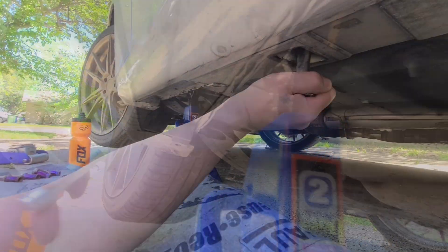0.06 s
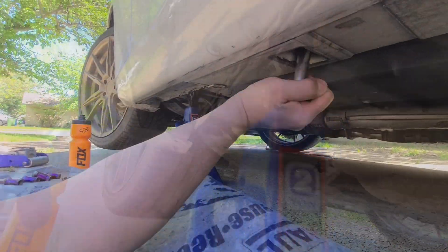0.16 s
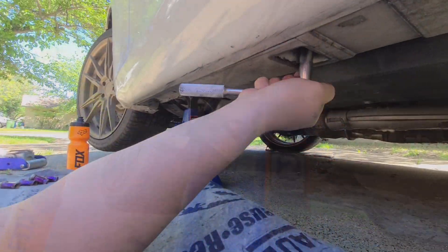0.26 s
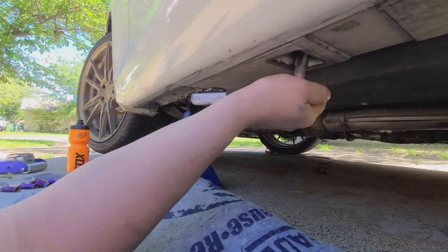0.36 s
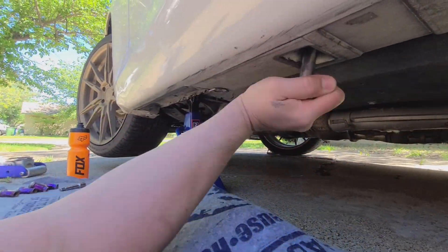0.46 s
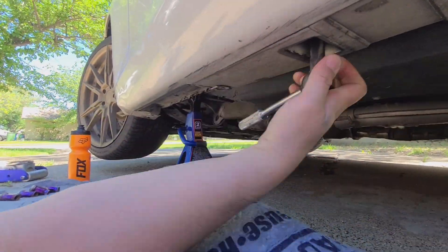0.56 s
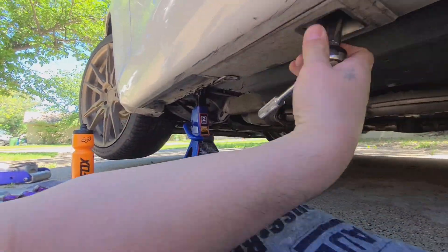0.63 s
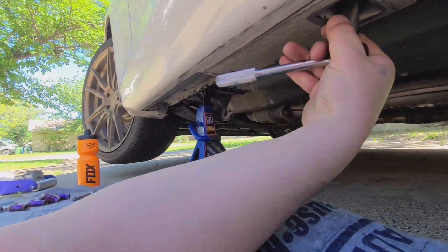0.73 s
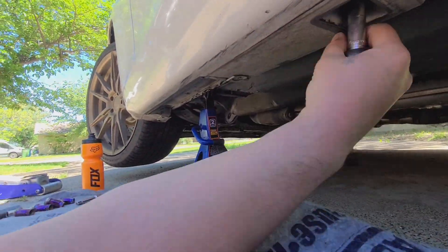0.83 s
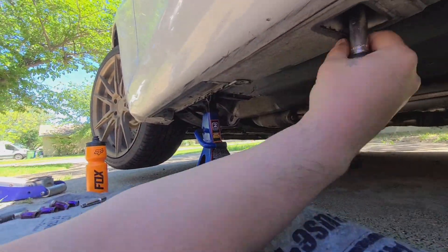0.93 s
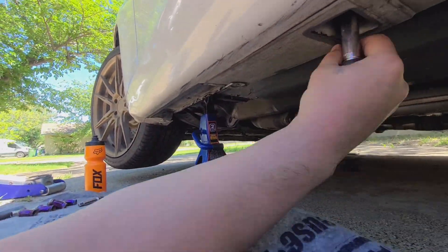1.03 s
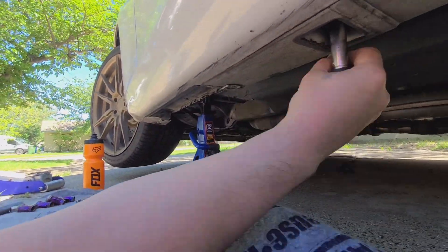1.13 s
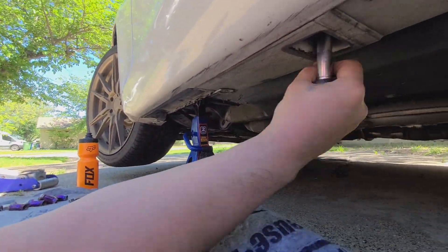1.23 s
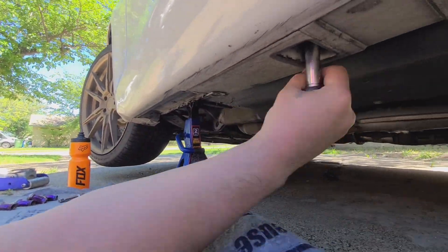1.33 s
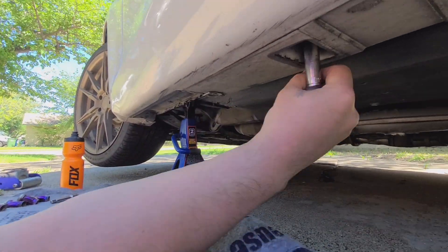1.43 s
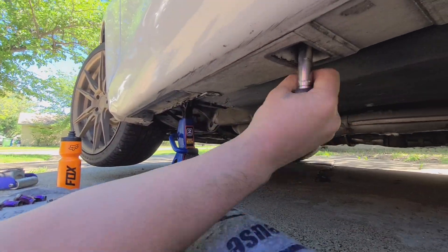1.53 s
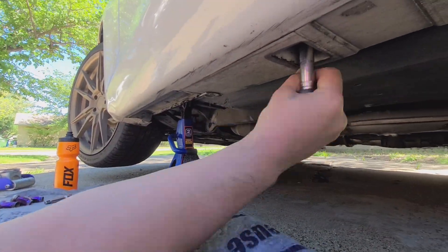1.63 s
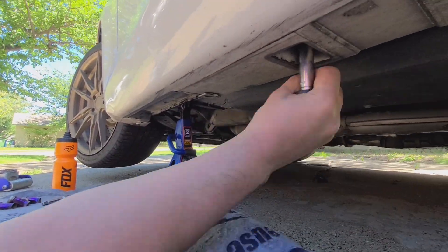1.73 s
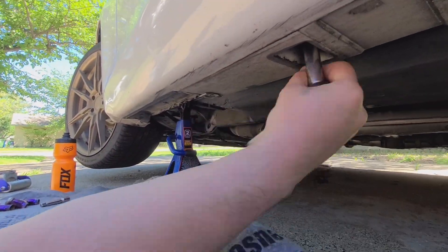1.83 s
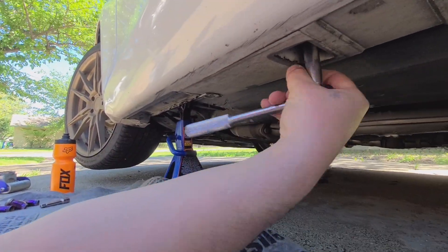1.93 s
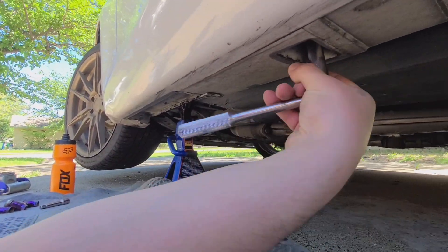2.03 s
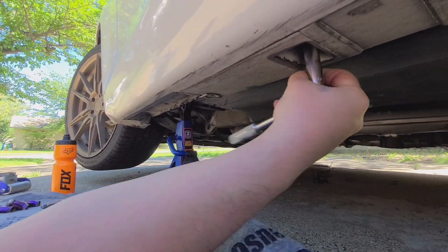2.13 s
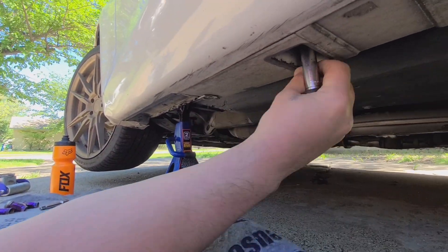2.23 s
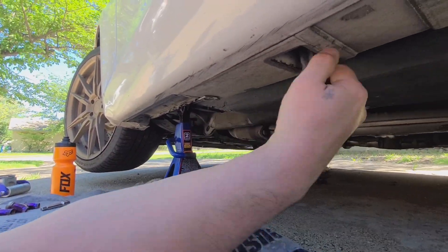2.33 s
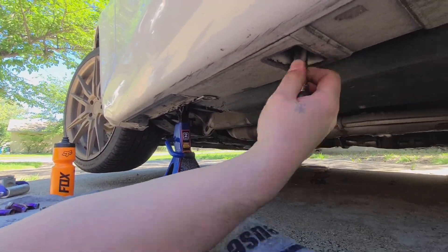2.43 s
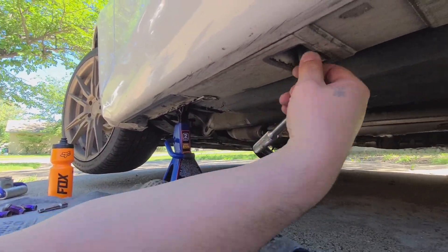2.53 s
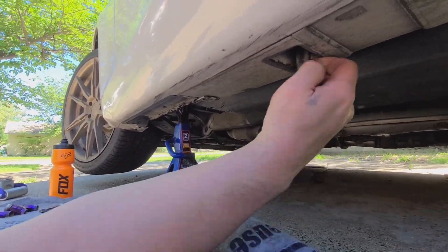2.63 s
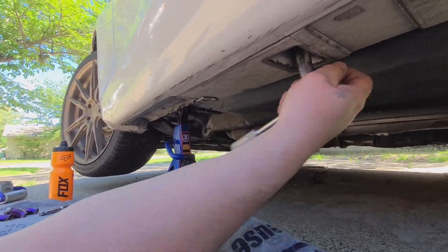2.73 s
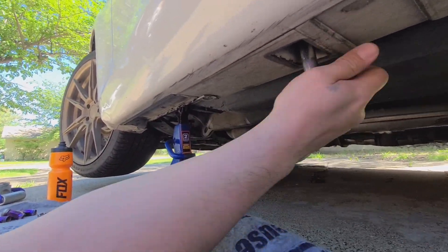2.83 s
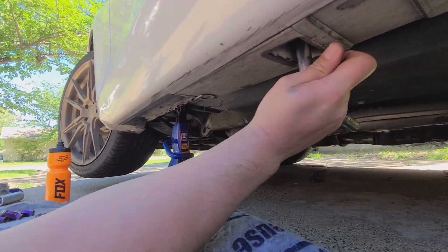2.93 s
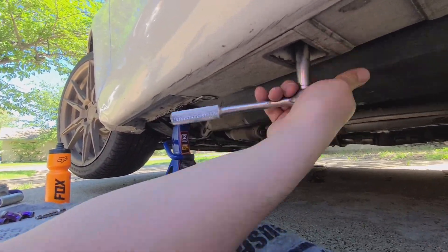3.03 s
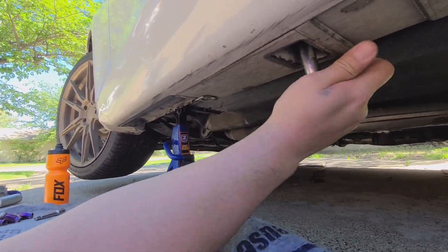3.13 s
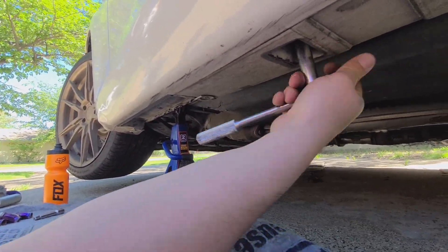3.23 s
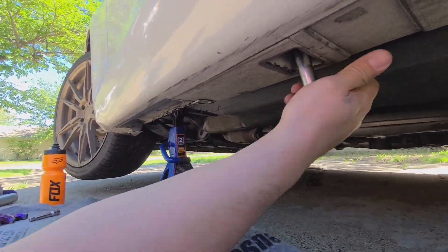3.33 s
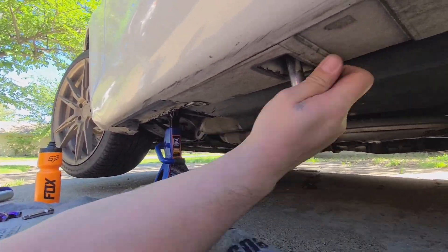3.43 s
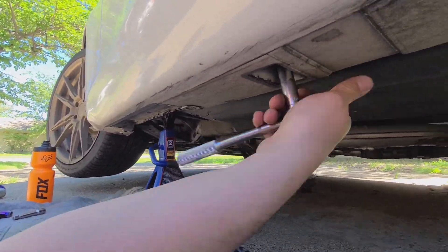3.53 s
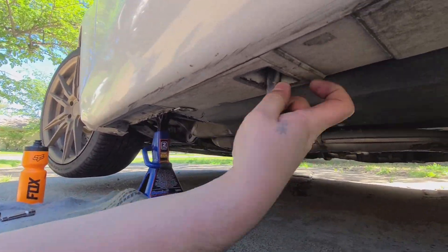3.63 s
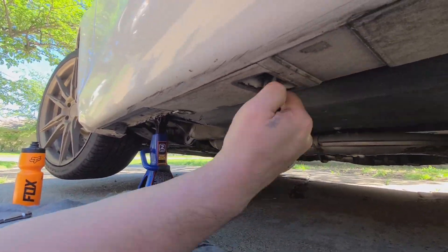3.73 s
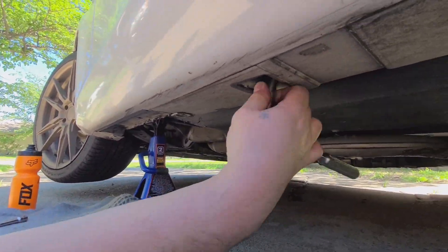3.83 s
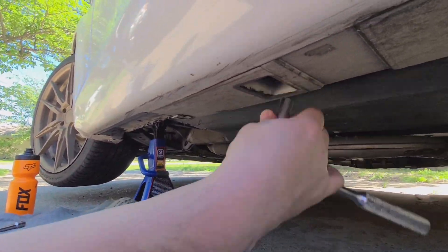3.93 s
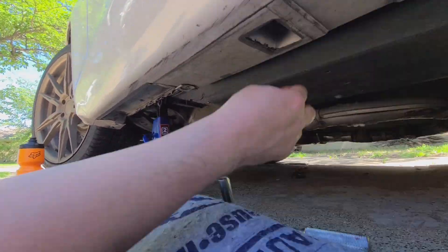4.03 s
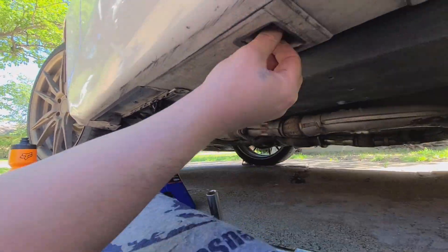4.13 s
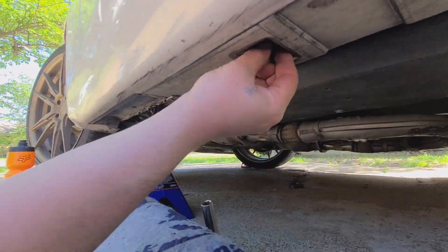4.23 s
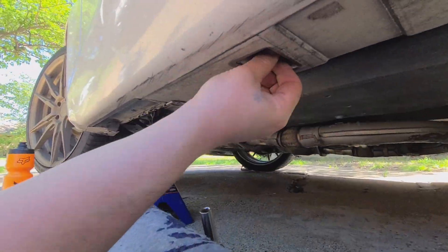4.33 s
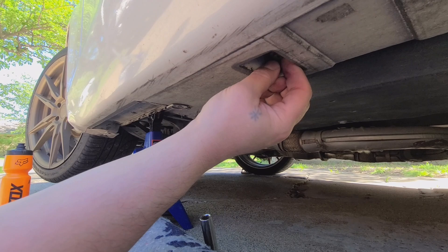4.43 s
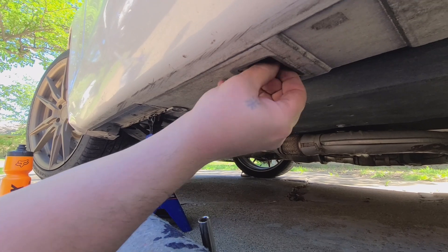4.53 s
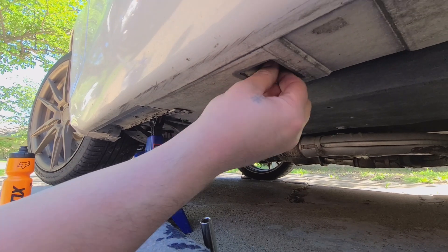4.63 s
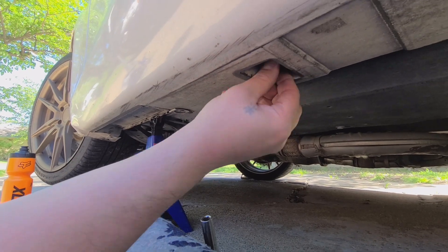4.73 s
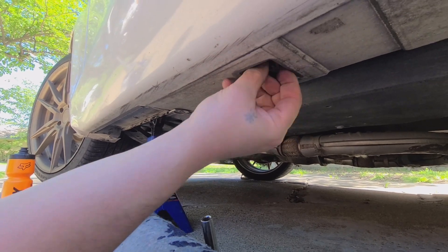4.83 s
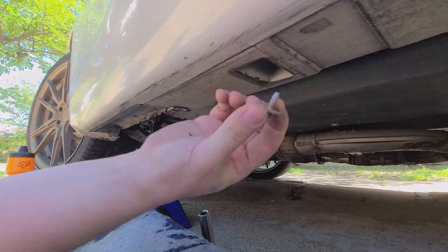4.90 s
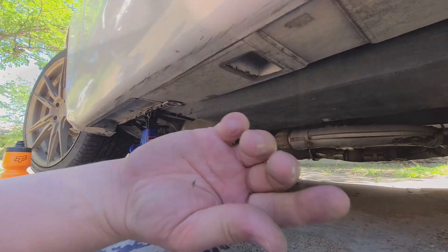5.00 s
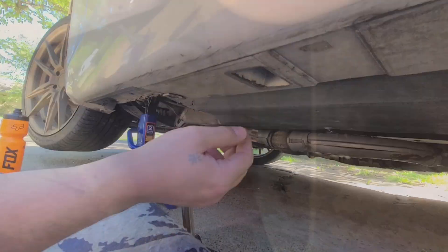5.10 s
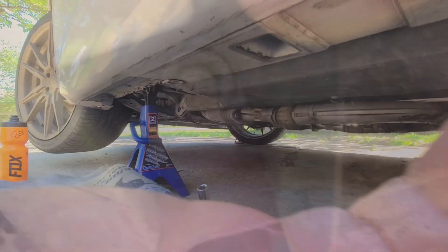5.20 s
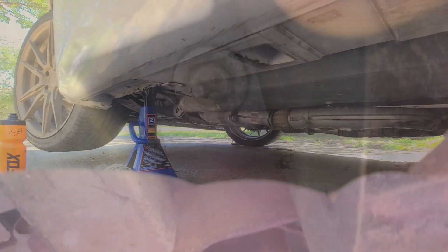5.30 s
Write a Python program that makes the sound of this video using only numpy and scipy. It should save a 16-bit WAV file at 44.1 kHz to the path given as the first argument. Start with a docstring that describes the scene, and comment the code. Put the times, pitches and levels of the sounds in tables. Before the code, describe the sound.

Outdoors, over a low neighbourhood rumble, distant hiss and very faint insects, a socket ratchet works on a bolt beneath a car. Its bright, dry clicks come close up in two irregular runs with a short gap between them, mixed with dull bumps on the underbody. A hard knock with a brief steel ring ends the work, and only light hand scuffs and soft thumps follow.

```python
"""A socket ratchet works a bolt under a car, over neighbourhood rumble, far hiss and thin insect bands.
From 0.1 s the pawl clicks in quick groups: each impact excites the steel's modes and is cut off after
a few hundredths of a second. Hands and tools scuff and bump the hollow underbody. The clicks pause
at 2.1 s, resume at 2.6 s and end around a hard knock near 4 s; soft bumps and scuffs follow."""
import sys
import numpy as np
from scipy import signal
from scipy.fft import rfft, irfft, next_fast_len
from scipy.io import wavfile
from scipy.ndimage import uniform_filter1d, map_coordinates

SR = 44100
rng = np.random.default_rng(int(sys.argv[2]) if len(sys.argv) > 2 else 0)


def digitize_waveform(pressure):
    """Quantize a signal to 16-bit integers and store it at the path in sys.argv[1].

    Rows of a 2-D input are taken as channels; values are limited to [-1, 1].
    """
    field = np.atleast_2d(pressure).T
    bounded = np.clip(field, -1, 1)
    quanta = np.round(bounded * 32767).astype(np.int16)
    wavfile.write(sys.argv[1], SR, quanta)


N = 236287

# Background envelopes: (time [s], rumble [dB], drone [dB], hiss [dB])
YARD_LEVELS = [(0, -37, -36, -49.5), (0.199, -41, -36.5, -53.5), (0.501, -46, -45, -55),
               (.8, -47.5, -45, -54), (1, -46, -41.5, -52.5), (1.57, -45, -34.5, -50),
               (2.05, -38, -39, -54.5), (2.4, -42, -42, -52), (3.05, -39.5, -37, -51.5),
               (3.55, -39, -44, -56), (4.09, -39, -38.5, -52), (4.251, -50.5, -41, -58),
               (4.5, -42, -38.5, -57), (4.8, -39, -35.5, -57), (5.36, -40.5, -40.5, -52.5)]
# Gain of the drone's upper band: (time [s], level [dB])
UPPER_DRONE_GAIN = [(0, -2), (.9, 6.5), (2, 3.5), (3.9, 5), (4.4, -6), (5.36, -12.5)]
# Noise spectra: (frequency [Hz], relative level [dB])
RUMBLE_SPECTRUM = [(15, -37.5), (30, -0.5), (60, 18), (110, 12.5), (170, -4.5), (260, -54.5)]
DRONE_SPECTRUM = [(90, -4.5), (150, 2), (240, -1), (340, -11), (400, -10.5), (440, -6.5), (490, -18.5),
                  (560, -19), (680, -29.5), (900, -70)]
HISS_SPECTRUM = [(400, -11.5), (750, -5.5), (1200, 0), (1600, -2), (3000, -12), (3700, -12.5),
                 (4300, -15.5), (5500, -23.5), (7000, -50)]
AIR_SPECTRUM = [(4000, -38.5), (5500, -3.5), (7500, -14), (10000, -4), (12500, -16), (15500, -13.5),
                (16200, -34)]
CRACK_SPECTRUM = [(500, -44), (1500, -1.5), (3000, -9), (5000, 9), (7000, 1), (9000, 4), (12000, 6.5),
                  (13200, 3), (15500, 6.5), (15900, -13), (16550, -11.5), (16900, -45.5)]
SCUFF_SPECTRUM = [(700, -17), (1500, 7.5), (3500, 13), (6000, -1.5), (8000, -35)]
SCUFF_TREBLE_SPECTRUM = [(4000, -20), (7000, -4.5), (12000, -6), (15500, -12), (16200, -51)]
# Echo spectrum relative to the crack's: (frequency [Hz], level [dB])
ECHO_COLOUR = [(1500, 5.5), (3500, 12.5), (5500, -8), (8000, -2.5), (12000, -9), (15000, 0.5)]
# Left-right likeness of diffuse noise: (frequency [Hz], correlation [1])
COHERENCE = [(25, .87), (300, .9), (600, .5), (1000, .05), (4000, .15), (6500, .5), (12000, .7)]
# Left over right for near sounds: (frequency [Hz], level [dB])
NEAR_BALANCE = [(200, -4.5), (600, 6), (1300, 1.5), (3000, 13), (4500, 6), (7000, -6.5), (12000, -12.5)]
# Resonances of the hollow under the car: (frequency [Hz], bandwidth [Hz], level [dB])
CAVITY_MODES = [(158, 75, 3), (201, 122.7, 3), (410, 74, 1), (544, 69, -7), (1216, 264, -16)]
# Blows on the underbody: (time [s], duration [s], level [dB], frequency [Hz])
UNDERBODY_KNOCKS = [(0.103, 0.024, -27.5, 431), (0.227, 0.031, -16.5, 228), (0.291, 0.023, -23, 187),
                    (0.388, 0.029, -28, 429), (0.743, 0.042, -33, 590), (0.815, 0.022, -21.5, 398.5),
                    (1.084, 0.01, -27.5, 454), (1.386, 0.037, -20.5, 190), (1.971, 0.053, -32, 92),
                    (2.96, 0.021, -31, 440), (2.311, 0.042, -27, 401), (3.748, 0.03, -26, 410),
                    (3.981, 0.009, -11, 539), (3.982, 0.0063, -24.5, 169), (3.998, 0.014, -22.5, 555),
                    (4.024, 0.019, -32, 533), (4.079, 0.014, -22, 550), (4.139, 0.033, -37, 410),
                    (4.495, 0.03, -33.5, 396), (4.714, 0.022, -28.5, 249), (4.753, 0.063, -31.5, 200),
                    (4.836, 0.029, -29.5, 398)]
# Skin and cloth rubbing: (time [s], duration [s], level [dB], treble level [dB])
RUBS = [(0.224, 0.015, -45, -64.5), (0.324, 0.089, -61, -65), (0.452, 0.039, -51.5, -57),
        (0.741, 0.03, -41, -53), (0.808, 0.035, -43.5, -57), (0.816, 0.0064, -34, -58),
        (1.081, 0.04, -44.5, -74), (1.989, 0.087, -57.5, -59), (2.167, 0.031, -66, -71),
        (2.301, 0.048, -46.5, -58.5), (3.743, 0.024, -53.5, -58), (3.917, 0.024, -54, -61.5),
        (3.978, 0.01, -23, -45), (3.987, 0.028, -34, -39.5), (4.067, 0.029, -46.5, -52.5),
        (4.138, 0.038, -55, -63), (4.231, 0.05, -60.5, -74), (4.293, 0.034, -56.5, -73.5),
        (4.452, 0.021, -61.5, -74), (4.528, 0.023, -61.5, -76), (4.741, 0.018, -57, -69.5),
        (4.766, 0.064, -57.5, -75.5), (4.814, 0.0099, -59, -59), (4.828, 0.033, -43.5, -59.5),
        (5.077, 0.021, -52, -53.5), (5.167, 0.019, -48.5, -54.5)]
# Modes of the tool: (frequency [Hz], relative level [dB], base T60 [s])
HEAD_MODES = [(4540, -7, 0.015), (5100, -18, 0.044), (7650, -10, 0.018), (7776, -1, 0.059),
              (9200, -4.5, 0.053), (9430, -12, 0.038), (10100, -9.5, 0.052), (11500, -9.5, 0.011),
              (12100, -0.5, 0.086), (13400, -6.5, 0.049), (12240, -2, .04), (15300, 0, 0.052),
              (15500, -5, .02)]
HANDLE_UPPER_MODES = [(4090, -8, 0.0042), (4750, -8.5, 0.016), (5270, -10, 0.018), (7150, -15.5, 0.027)]
# The socket's pitch shifts with its seat on the bolt: (time [s], frequency [Hz])
SOCKET_PITCH = [(0, 1193), (2.75, 1181), (2.86, 1370), (3.05, 1412), (3.98, 1149)]
# The hand's hold on the tool: (time [s], ring time factor [1], treble tilt [dB])
HAND_GRIP = [(0, 1.1, -6), (.45, 0.97, 1.5), (.8, 0.57, 7), (1.15, 0.72, -6), (1.4, 1.32, 8),
             (1.68, 0.45, 5), (1.8, 1.35, -4), (2.05, 0.76, 0), (2.7, 1.34, 5.5), (2.87, 0.92, -0.5),
             (3.2, 1.2, 7), (3.55, 0.45, -1.5), (3.87, 1.6, 17.5), (3.97, 1.35, -10), (4.08, 2, 4)]
# Steel contacts; a few weak rows, such as 0.099 s, are a ring already sounding rather than a new blow: # (time
# [s], crack [dB], handle ring [dB], ring frequency [Hz], clank [dB], clank frequency [Hz], # socket ring [dB],
# duration [s])
PAWL_CLICKS = [(0.099, -31.5, -34, 3670, -47, 3280, -39, 0.026),
               (0.112, -18.5, -32, 3650, -23, 3960, -34.5, 0.019),
               (0.128, -23.5, -37, 3768, -30, 3490, -52, 0.03),
               (0.26, -31.5, -40, 3810, -42, 3170, -59, 0.0044),
               (.396, -13, -37, 3580, -19.5, 3190, -27.5, 0.023),
               (0.414, -16, -30, 3570, -21.5, 3420, -44, 0.0078),
               (.547, -43, -40, 3650, -44, 3320, -41, 0.0031),
               (0.737, -29, -39, 3810, -36.5, 3570, -39, .022),
               (0.765, -16, -37, 3720, -45, 3300, -30.5, 0.0069),
               (.892, -12.5, -32.5, 3710, -29, 3480, -43, .01),
               (0.913, -58, -60, 3800, -60, 3260, -67, .03), (0.974, -44, -55, 3750, -52, 4500, -60, 0.011),
               (0.99, -14.5, -27.5, 3710, -40, 3270, -36.5, 0.033),
               (1.1, -17, -26, 3710, -25, 3220, -29, .035),
               (1.193, -13, -31.5, 3830, -28.5, 3270, -51, 0.036),
               (1.231, -52.5, -38, 3790, -50, 3340, -60, 0.0028),
               (1.291, -17, -23, 3790, -31, 3200, -32.5, 0.02),
               (1.312, -20, -27.5, 3870, -29, 3470, -50, 0.032),
               (1.388, -13.5, -26, 3774, -16.5, 3400, -60, 0.025),
               (1.406, -15, -28, 3736, -17.5, 3290, -55, 0.029),
               (1.475, -25.5, -38, 3736, -31.5, 3400, -43, 0.029),
               (1.499, -16, -32.5, 3530, -26, 4250, -44, 0.012),
               (1.522, -37, -37, 3800, -30.5, 3120, -48, 0.028),
               (1.586, -14, -23, 3590, -38, 5200, -58, 0.016),
               (1.604, -25, -43, 3480, -39, 4710, -59, 0.011),
               (1.622, -39, -43, 3800, -34, 3180, -51, 0.0045),
               (1.631, -60, -37, 3620, -52, 3300, -60, 0.012),
               (1.673, -14.5, -21, 3686, -26, 3220, -36.5, 0.076),
               (1.801, -13, -19, 3810, -21.5, 3360, -29.5, 0.023),
               (1.819, -13, -22, 3766, -17, 3440, -41, 0.037),
               (1.909, -13, -30, 3660, -25, 3510, -40, 0.028),
               (1.933, -16.5, -30, 3900, -33, 3070, -35.5, 0.041),
               (2.036, -14.5, -22.5, 3780, -21, 3710, -60, .026),
               (2.06, -11.5, -17.5, 3790, -31, 4200, -36.5, 0.03),
               (2.629, -25.5, -27, 3800, -29, 3130, -34, .034),
               (2.657, -34.5, -37, 3750, -52, 3220, -41, 0.041),
               (2.691, -39, -42, 3800, -54, 3180, -50, 0.026),
               (2.706, -15, -25, 3766, -32.5, 3120, -33, .025),
               (2.847, -18, -27.5, 3830, -33.5, 3140, -36, 0.025),
               (2.869, -16.5, -20, 3660, -44, 3100, -25.5, 0.028),
               (2.884, -26, -48.5, 3710, -40, 3200, -38, 0.0067),
               (2.896, -10.5, -19, 3740, -25, 3170, -30, 0.022),
               (3.017, -15, -30.5, 3670, -29, 3140, -20, 0.043),
               (3.018, -18.5, -44, 3600, -38, 4560, -36.5, .003),
               (3.035, -13.5, -40.5, 3716, -28.5, 3310, -21.5, 0.017),
               (3.181, -19, -28, 3840, -26.5, 3413, -47, 0.016),
               (3.202, -26.5, -33, 3747, -35.5, 3340, -45, 0.02),
               (3.225, -9, -25, 3744, -27.5, 3260, -55, 0.013),
               (3.338, -18.5, -21.5, 3770, -25.5, 3330, -37, 0.045),
               (3.366, -42, -43, 3750, -43.5, 4200, -38.5, 0.035),
               (3.536, -15, -24.5, 3720, -24.5, 3290, -31.5, 0.037),
               (3.55, -42.5, -46, 3720, -49, 3050, -45, 0.0075),
               (3.845, -41.5, -39.5, 3830, -55, 3330, -61, 0.024),
               (3.86, -16, -25.5, 3787, -49, 3230, -35.5, 0.041),
               (3.982, -16.5, -15, 3593, -19, 3495, -18, 0.046),
               (4.082, -37.5, -26.5, 3575, -38, 3260, -29.5, 0.018)]

LEAD_S = 0.006  # a click starts this long before its impact
CLICK_TIME = np.arange(SR // 14) / SR - LEAD_S
RING_TIME = np.maximum(CLICK_TIME, 0)
ATTACK = 1 - np.exp(-(RING_TIME / 0.00094) ** 2)


def amp(db):
    """Amplitude grows tenfold per 20 dB."""
    return 10 ** (np.asarray(db) / 20)


def unit(x):
    """Normalisation to rms 1."""
    return x / np.sqrt(np.mean(x ** 2) + 1e-20)


def along(points, hz):
    """Interpolation on a logarithmic frequency axis."""
    freqs, values = np.transpose(points)
    return np.interp(np.log(hz + 1), np.log(freqs + 1), values)


def spectrum(points):
    """Amplitude response through points in dB."""
    return lambda hz: amp(along(points, hz))


def at_time(table, t):
    """Linear interpolation of each column in time."""
    times, *columns = np.transpose(table)
    return [np.interp(t, times, column) for column in columns]


def filtered(x, response):
    """Linear filtering: the spectrum times a complex response."""
    size = next_fast_len(x.shape[-1] + 8192)
    return irfft(rfft(x, size) * response(np.fft.rfftfreq(size, 1 / SR)), size)[..., :x.shape[-1]]


def wobble(rate):
    """Smooth random modulation, rate knots a second."""
    return map_coordinates(rng.standard_normal(int(N * rate / SR) + 4), [np.arange(N) * rate / SR])


def cutoff(t, lasts, fade):
    """Gating: a linear fade centred on the end of the duration."""
    return np.clip((lasts - t) / fade + .5, 0, 1)


def diffuse_noise(response, coherence=COHERENCE):
    """Partially coherent stereo noise: the mid-side ratio sets the correlation."""
    def mid_side(hz):
        angle = np.arccos(np.clip(along(coherence, hz), -1, 1)) / 2
        return response(hz) * [np.cos(angle), np.sin(angle)]
    mid, side = filtered(rng.standard_normal((2, N)), mid_side)
    return unit(np.array([mid + side, mid - side]))


def streaky(x, depth_db):
    """Spectral modulation: narrow, random streaks of pitch, each a few hundredths of a second long."""
    bins = signal.stft(x, nperseg=512)[2]
    field = uniform_filter1d(rng.standard_normal(bins.shape[1:]), size=2, axis=0)
    field = uniform_filter1d(field, size=6, axis=1)
    return unit(signal.istft(bins * amp(depth_db * unit(field)), nperseg=512)[1][:, :N])


def near_field(x, lean=1):
    """Path difference: near sounds reach the right first; the treble arrives in phase."""
    def response(hz):
        lag = np.exp(-4j * np.pi * np.tanh((hz / 6400) ** 3) ** (1 / 3))
        return amp(lean * along(NEAR_BALANCE, hz) * [[.5], [-.5]]) * [lag, np.ones_like(hz)]
    return filtered(x, response)


def neighbourhood(split_hz=346):
    """Amplitude-modulated noise: rumble, drone and hiss jump in level together; the treble flickers."""
    t = np.arange(N) / SR
    rumble_db, drone_db, hiss_db = at_time(YARD_LEVELS, t)
    jump = wobble(28)
    rumble = amp(rumble_db + 3.3 * wobble(20) + 2 * jump) * diffuse_noise(spectrum(RUMBLE_SPECTRUM))
    drone_db += 1.2 * wobble(13) + 2.2 * jump + 2.2 * wobble(30)
    drone = amp(drone_db) * diffuse_noise(spectrum(DRONE_SPECTRUM))
    upper = filtered(drone, lambda hz: 1 / (1 + (split_hz / (hz + 1)) ** 8))
    drone += upper * (amp(at_time(UPPER_DRONE_GAIN, t)[0] + 2.6 * wobble(22.01)) - 1)
    hiss_gain = amp(hiss_db + 1.2 * jump + .8 * wobble(28))
    hiss = near_field(diffuse_noise(spectrum(HISS_SPECTRUM), coherence=[(1000, .5)]), lean=.3)
    air_gain = amp(hiss_db - 22 + 2.3 * wobble(24))
    air = streaky(diffuse_noise(spectrum(AIR_SPECTRUM)), depth_db=5)
    return (rumble + drone) * amp([[.4], [-.4]]) + hiss_gain * hiss + air_gain * air


def insects():
    """Narrow-band noise: insects hold two faint, wavering pitches."""
    high = amp(-84 + 2.5 * wobble(19)) * diffuse_noise(lambda hz: np.exp(-((hz - 10300) / 180) ** 2))
    low = amp(-87 + 3 * wobble(5)) * diffuse_noise(lambda hz: np.exp(-((hz - 5700) / 400) ** 2))
    return high + low


def cavity(hz):
    """Modal superposition: the hollow's resonances add in alternating sign, low-passed."""
    modes = sum((-1) ** k * amp(db) * 1j * hz * width / (centre ** 2 - hz ** 2 + 1j * hz * width)
                for k, (centre, width, db) in enumerate(CAVITY_MODES))
    return modes / (1 + (hz / 2500) ** 2)


def knocks(thud_db=-9):
    """Impact excitation: the underbody gives a damped boom and a thud of cavity-filtered noise."""
    t = np.arange(SR // 12) / SR
    thud, boom = np.zeros((2, N + SR))
    for start, lasts, db, hz in UNDERBODY_KNOCKS:
        span = round(start * SR) + np.arange(len(t))
        shape = np.clip(t / 0.0012, 0, 1) * cutoff(t, lasts, fade=0.0039)
        thud[span] += amp(db + thud_db) * shape * np.clip(t / 0.0013, 0, 1)
        boom[span] += amp(db - 60 * t / 0.09) * shape * np.sin(2 * np.pi * hz * t)
    return near_field(boom[:N]) + thud[:N] * diffuse_noise(cavity)


def scuffs():
    """Sliding friction: skin and cloth give short swells of noise in two bands."""
    t = np.arange(SR // 12) / SR
    gains = np.zeros((2, N + SR))
    for start, lasts, db, treble_db in RUBS:
        span = round(start * SR) + np.arange(len(t))
        swell = np.clip(t / [[.007], [.009]], 0, 1) * cutoff(t, lasts, fade=1.1 * lasts)
        gains[:, span] += amp([[db], [treble_db]]) * swell
    rub = streaky(diffuse_noise(spectrum(SCUFF_SPECTRUM), coherence=[(1000, .3)]), depth_db=5.5)
    treble = streaky(diffuse_noise(spectrum(SCUFF_TREBLE_SPECTRUM)), depth_db=5)
    return gains[0, :N] * near_field(rub, lean=.25) + gains[1, :N] * treble


def scattered(x):
    """Scattering: the underbody throws treble back, by a new path for each side and click."""
    t = np.arange(SR // 100) / SR
    tail = rng.standard_normal((2, len(t))) * amp(-60 * t / 0.0043)
    tail = np.diff(tail / np.linalg.norm(tail[0]), axis=1) / 2
    return amp(2.5) * signal.fftconvolve(x, tail, axes=1)[:, :x.shape[1]]


def damped_tone(hz, db, t60, phase=0):
    """Free vibration: one mode decays by 60 dB in t60 seconds."""
    return amp(db - 60 * RING_TIME / t60) * np.sin(2 * np.pi * hz * CLICK_TIME + phase)


def struck_modes(modes, draw, spread_db, stretch):
    """Modal excitation at random strengths and slight detunings; returns the tones and initial rms."""
    hz, db, t60 = np.transpose(modes)[:, :, None]
    strength, drift, phase = draw.T[:, :, None]
    gain = amp(db + spread_db * strength)
    pitch = hz * (1 + .018 * drift)
    envelope = gain * amp(-60 * RING_TIME / (t60 * stretch))
    return envelope * np.sin(2 * np.pi * pitch * RING_TIME + 3 * phase), np.sqrt(np.sum(gain ** 2) / 2)


def head_strike(db, echo_db, tilt_db, grit, rattle, draw):
    """Impact excitation: a crack rings the head's modes; a faint, brief rise of noise comes just before."""
    t = CLICK_TIME
    lead_in = amp(-21.5 + 60 * t / 0.025) * (t < .001) * np.clip((t + LEAD_S) / 0.0013, 0, 1)
    crack = (amp(-60 * RING_TIME / 0.013) * ATTACK + lead_in) * grit
    fast, fast_rms = struck_modes(HEAD_MODES, draw[0], spread_db=5, stretch=0.21)
    slow, slow_rms = struck_modes(HEAD_MODES, draw[1], spread_db=8, stretch=1.6)
    ping = amp(db + 0.5) * fast.sum(0) / fast_rms
    shimmer = amp(echo_db - 2.5) * (slow * (0.2 + rattle)).sum(0) / slow_rms
    tilt = lambda hz: amp(tilt_db * np.clip(np.log2((hz + 1) / 10500) * 1.4, -.5, .5))
    return filtered(amp(db) * crack + ATTACK * (ping + shimmer), tilt)


def handle_ring(hz, db, stretch, draw):
    """Damped resonance: the handle's main and upper modes ring as long as the grip allows."""
    upper, _ = struck_modes(HANDLE_UPPER_MODES, draw[:len(HANDLE_UPPER_MODES)], 3, stretch)
    return damped_tone(hz, db, t60=0.029 * stretch, phase=3 * draw[-2, 0]) + amp(db) * upper.sum(0)


def ratchet(linger_db=-21.5):
    """Superposition: each contact sounds head, pawl, handle and socket, and echoes under the car."""
    t, samples = CLICK_TIME, np.arange(len(CLICK_TIME))
    direct, indirect = np.zeros((2, 2, N + SR))
    echo = np.zeros(N + SR)
    crack_colour = spectrum(CRACK_SPECTRUM)
    grit = unit(filtered(rng.standard_normal(N + SR), crack_colour))
    loose, chatter = wobble(900), wobble(1400)  # loose parts roughen each mode
    ring_rise = 1 - np.exp(-RING_TIME / 0.0011)
    for start, db, ring_db, ring_hz, clank_db, clank_hz, socket_db, lasts in PAWL_CLICKS:
        span = round((start - LEAD_S) * SR) + samples
        gate = np.maximum(cutoff(t, lasts, fade=.005), amp(linger_db) * cutoff(t, .055, fade=.02))
        echo_db = -31 + 0.52 * (db + 14)  # grows about half as fast as the crack
        stretch, tilt_db = at_time(HAND_GRIP, start)
        socket_hz, = at_time(SOCKET_PITCH, start)
        *head_draw, draw = rng.standard_normal((3, len(HEAD_MODES), 3))
        rattle = loose[rng.integers(N - len(t), size=(len(HEAD_MODES), 1)) + samples]
        head = head_strike(db, echo_db, tilt_db, grit[span], rattle, head_draw)
        handle = handle_ring(ring_hz, ring_db, stretch, draw) * (1.74 + 0.34 * rattle[1])
        clank = damped_tone(clank_hz, clank_db, t60=0.015, phase=3 * draw[-2, 1])
        clank *= 1.8 + 1.18 * chatter[span]
        socket = damped_tone(socket_hz, socket_db, t60=0.077) * (0.49 + 0.22 * rattle[0])
        swing = amp(draw[-1, 0] * np.array([[1.5], [-1.5]]))  # the tool sways from side to side
        click = gate * (head * swing + ATTACK * ((handle + clank) * ring_rise + socket))
        direct[:, span] += click
        conducted = amp(-3) * gate * ATTACK * socket  # the socket also sounds through the underbody
        indirect[:, span] += scattered(click) + conducted
        echo[span] += gate * ATTACK * amp(echo_db - 60 * RING_TIME / 0.081)
    echo_noise = diffuse_noise(lambda hz: crack_colour(hz) * amp(along(ECHO_COLOUR, hz)))
    return near_field(direct[:, :N]) + indirect[:, :N] + echo[:N] * streaky(echo_noise, depth_db=8.5)


def scene():
    """The pressures of independent sources add."""
    return ratchet() + knocks() + scuffs() + neighbourhood() + insects()


def record(dry, ceiling=.95, top_hz=16950):
    """Soft saturation rounds the loudest peaks; a band limit removes the highest treble."""
    rounded = dry / (1 + np.abs(dry / ceiling) ** 4) ** (1 / 4)
    return filtered(rounded, lambda hz: hz < top_hz)


dry = scene()
out = record(dry)
digitize_waveform(out)
```